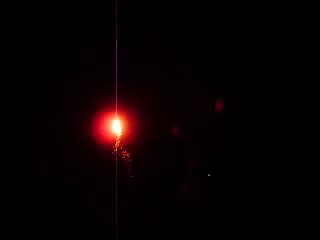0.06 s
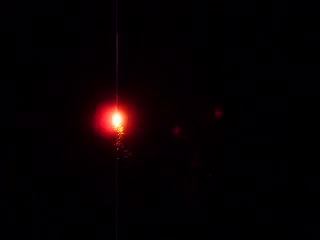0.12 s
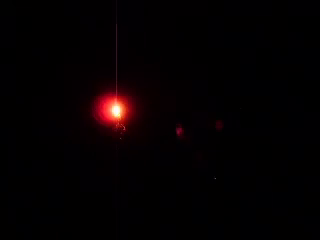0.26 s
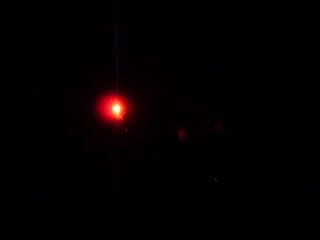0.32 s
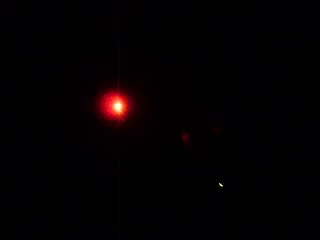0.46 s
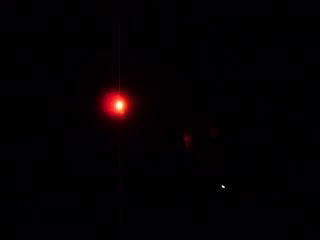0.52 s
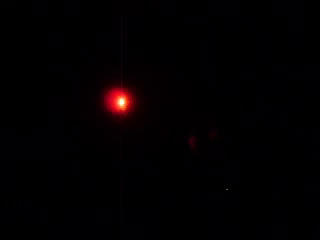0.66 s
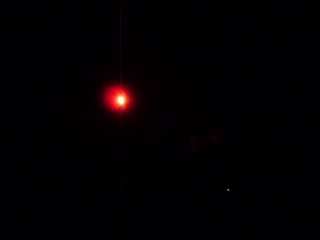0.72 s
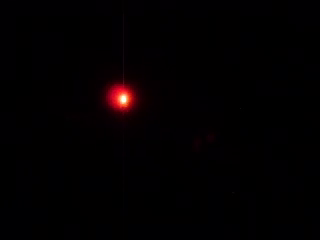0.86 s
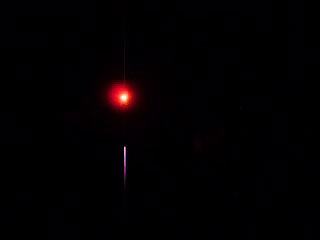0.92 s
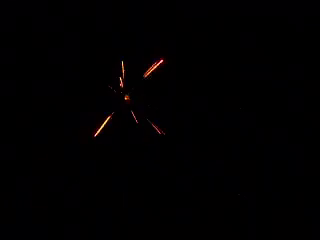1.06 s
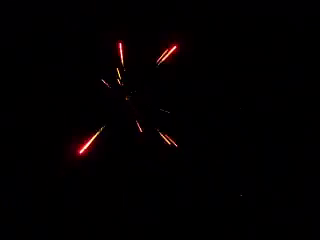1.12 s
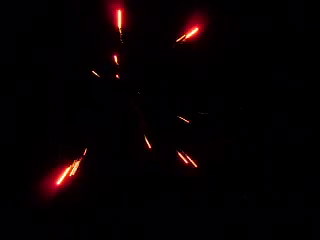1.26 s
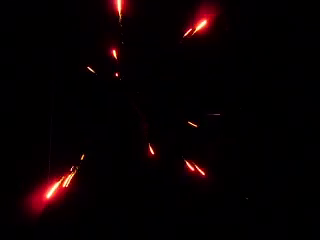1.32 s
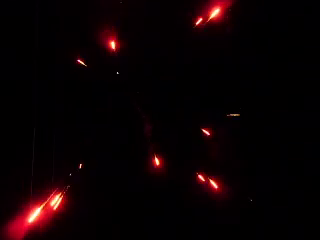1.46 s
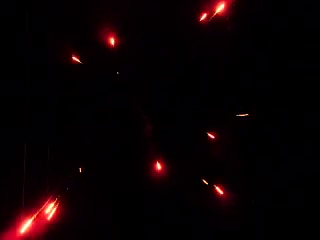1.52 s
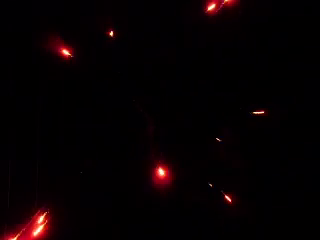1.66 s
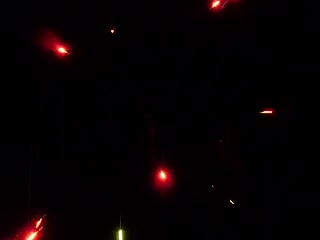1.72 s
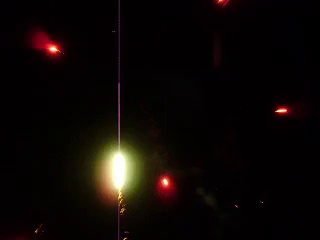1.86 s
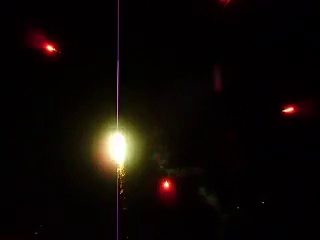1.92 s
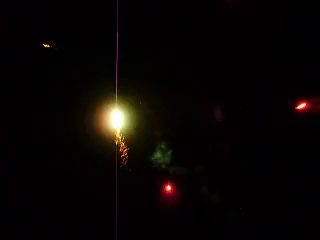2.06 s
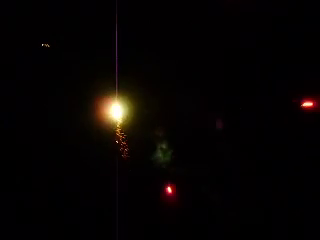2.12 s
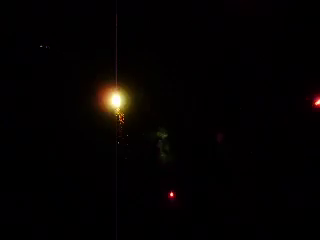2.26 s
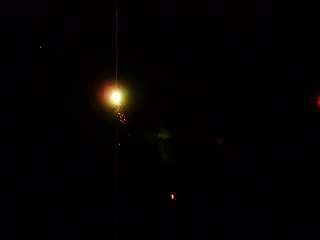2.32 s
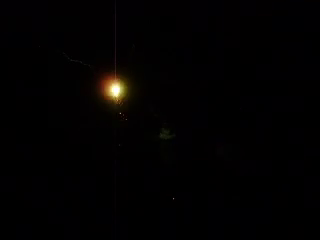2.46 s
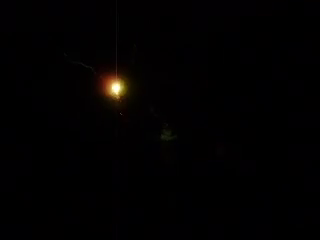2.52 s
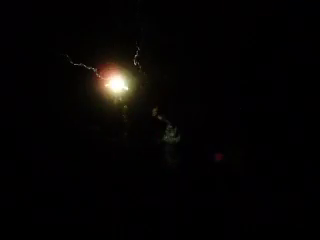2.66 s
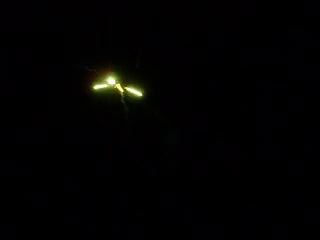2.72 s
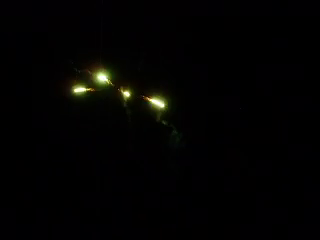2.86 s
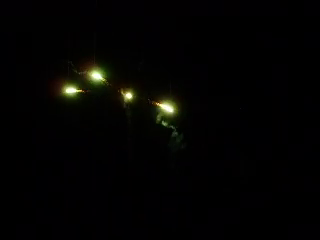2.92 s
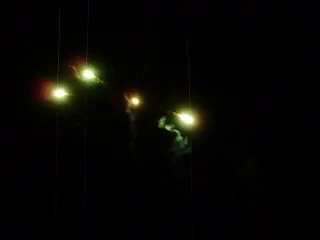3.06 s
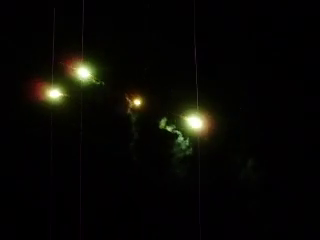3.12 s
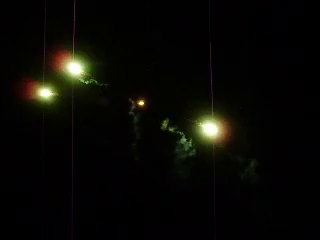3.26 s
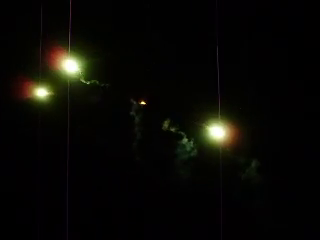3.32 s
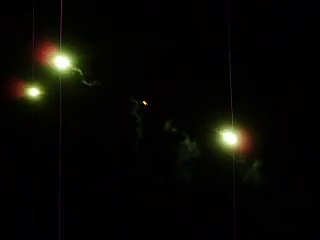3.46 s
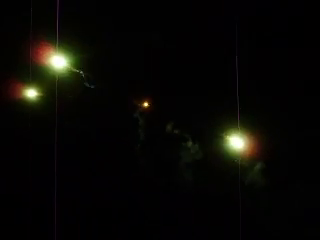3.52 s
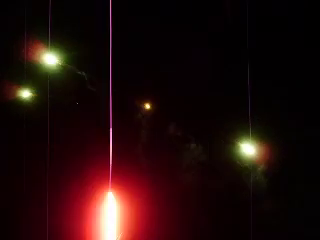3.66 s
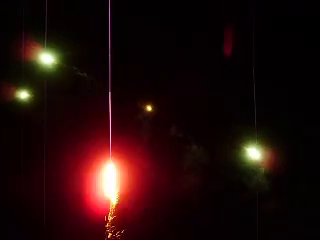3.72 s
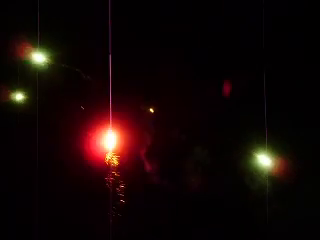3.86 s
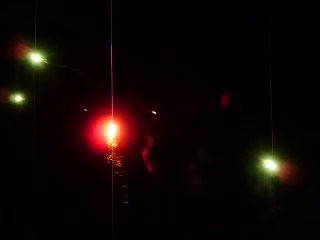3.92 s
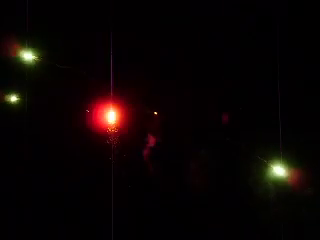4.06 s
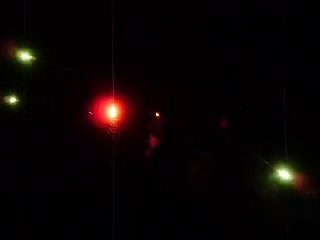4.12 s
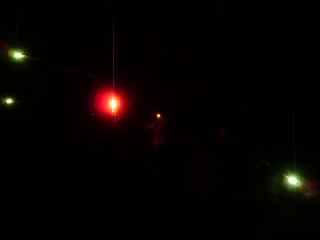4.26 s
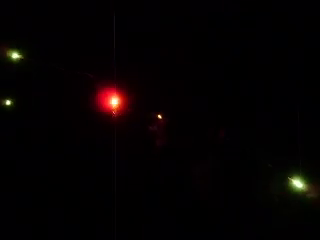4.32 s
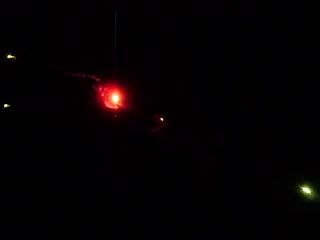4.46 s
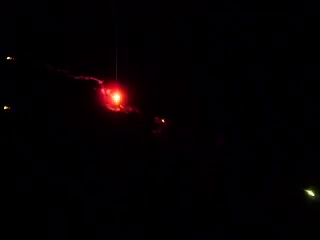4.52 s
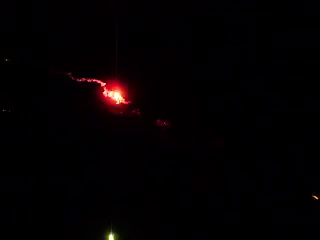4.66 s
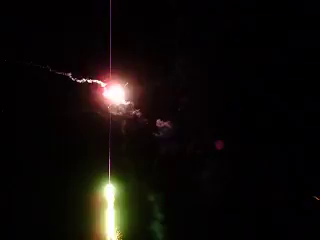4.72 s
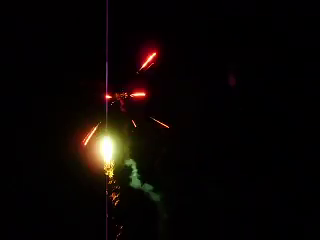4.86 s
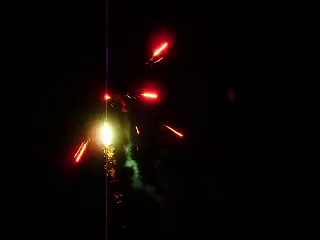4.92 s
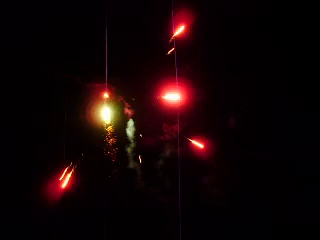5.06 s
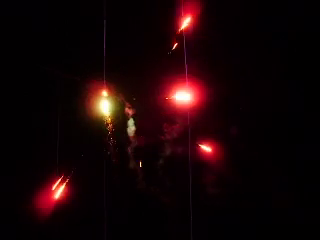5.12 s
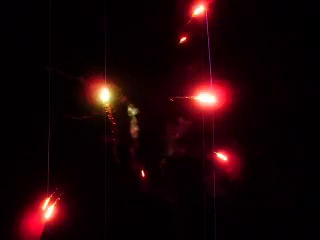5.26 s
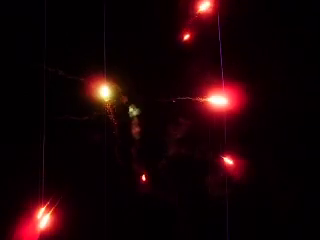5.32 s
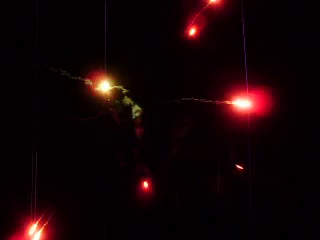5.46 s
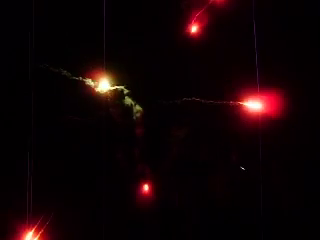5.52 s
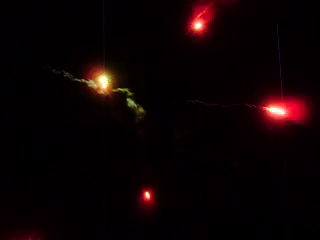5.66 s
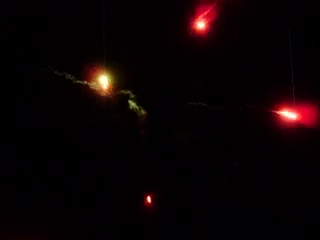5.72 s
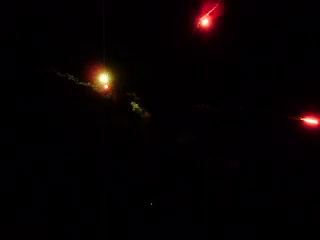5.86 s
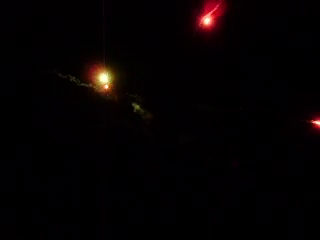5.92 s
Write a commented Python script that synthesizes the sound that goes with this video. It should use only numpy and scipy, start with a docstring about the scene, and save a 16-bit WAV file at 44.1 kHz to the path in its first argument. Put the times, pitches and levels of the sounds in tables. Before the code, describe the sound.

Night fireworks outdoors, heard through a small, muffled microphone that overloads on every shot. At first only the fading roll and hiss of an earlier burst, over low open-air rumble. A soft thump at 1.1 s, then a hard overhead bang at 1.2 s with fast wall reflections and, just under a tenth of a second later, a very short ragged chirp falling in pitch. Its far echoes return in waves of clumpy roar and hiss. A tube launch thuds at 1.7 s; distant slaps at about 2.15 s and a faint thump at 2.5 s. A brighter, higher-pitched bang follows at 2.9 s. Launch thuds land at 3.5 s and 4.6 s, each leaving a low rumble, with a dull thump at 4.4 s between. The last bang comes at 4.95 s; its echoes linger while low rumble swells around 5.3 s and a cluster of dull far slaps patters from 5.7 to 5.9 s.

```python
"""Echoes of earlier shots roll in by waves under the hiss of burning stars: a fireworks cake fires comets at night.
Each shot leaves its tube with a thud, then shells bang overhead: filtered pressure pulses plus single echoes and
fading noise from nearby walls. A ribbed surface answers each burst with a short falling chirp of two ragged sines.
Far echoes, hiss and rumble are clumpy filtered noise; dull thumps and far slaps dot the scene.
A small, dull microphone overloads on the shots."""
import sys
import numpy as np
from scipy import signal
from scipy.fft import rfft, irfft
from scipy.io import wavfile
from scipy.ndimage import uniform_filter1d

SR = 44100
rng = np.random.default_rng(int(sys.argv[2]) if len(sys.argv) > 2 else 0)


def master_out(mix):
    """Clip the mix to full scale and print it as 16-bit PCM to the path in sys.argv[1]."""
    frames = np.transpose(np.atleast_2d(mix))
    ceiling = np.clip(frames, -1, 1)
    pcm = np.round(ceiling * 32767).astype(np.int16)
    wavfile.write(sys.argv[1], SR, pcm)


N = 263718


def amp(db):
    """Decibels to gain."""
    return 10 ** (np.asarray(db) / 20)


def evened(x):
    """Scales to rms 1."""
    return x / np.sqrt(np.mean(x ** 2) + 1e-20)


def peaked(x):
    """Scales to peak 1."""
    return x / abs(x).max()


def add(mix, start_s, sound):
    """Mixes a sound in at a time; it may have begun before time zero."""
    at = round(start_s * SR)
    sound = sound[max(-at, 0):]
    part = mix[max(at, 0):][:len(sound)]
    part += sound[:len(part)]


def shifted(spectrum, factor):
    """The same spectrum, higher or lower in pitch."""
    return np.array(spectrum) * [factor, 1]


def colour(x, spectrum, size=8192):
    """Causal minimum-phase filter with a given spectrum."""
    hz, db = np.transpose(spectrum)
    f = abs(np.fft.fftfreq(size, 1 / SR))
    gain_db = np.interp(np.log(f + 1), np.log(hz + 1), db)
    log_gain = np.log(amp(gain_db))
    response = np.exp(np.conj(signal.hilbert(log_gain)))
    taps = np.fft.ifft(response).real[:size // 2]
    return signal.fftconvolve(x, taps)[:len(x)]


def drift(n, per_s):
    """Smooth random wander of rms 1."""
    f = np.fft.rfftfreq(n, 1 / SR)
    lowpass = np.exp(-(f / per_s) ** 2)
    return evened(irfft(rfft(rng.standard_normal(n)) * lowpass, n))


def clatter(n, spectrum, lumpy_db, lumps_per_s):
    """Countless overlapping echoes that arrive in clumps; rms 1."""
    clumps = amp(lumpy_db * drift(n, lumps_per_s))
    return evened(colour(rng.standard_normal(n) * clumps, spectrum))


def swell(age_s, rise_s, fade_s):
    """Gain that rises in a straight line and then dies away exponentially."""
    return np.clip(age_s / rise_s, 0, 1) * np.exp(-np.maximum(age_s - rise_s, 0) / fade_s)


def blast(length_s, size=2048):
    """Pressure jump followed by a longer suction; length_s is the zero crossing."""
    u = np.arange(size) / SR / length_s
    return (1 - u) * np.exp(-u)


def rough_wall(fade_s, size=1024):
    """A rough surface smears an echo over a few milliseconds and keeps its energy and colour."""
    smear = rfft(rng.standard_normal(size) * np.exp(-np.arange(size) / SR / fade_s))
    smooth_power = uniform_filter1d(abs(smear) ** 2, size=15)
    return irfft(smear / np.sqrt(smooth_power), size)


# Low rumble of the open air. Each row: time in s, level in dB.
AIR_RUMBLE = [(0, -47), (1, -47), (2.6, -44), (3.4, -46), (4.0, -33.5), (4.9, -33), (5.35, -23),
              (5.75, -30), (5.98, -30)]
# Rumble spectrum. Each row: frequency in Hz, relative density in dB per Hz.
RUMBLE_SPECTRUM = [(12, -23), (30, -5), (60, -5), (100, -2), (140, -1.5), (260, -23)]
RUMBLE_SWELL_S, RUMBLE_FADE_S, LAUNCH_RUMBLE_DB = .16, .2, -28


def rumble():
    """Every launch leaves a low rumble, which swells and dies away over that of the open air."""
    t = np.arange(N) / SR
    power = amp(np.interp(t, *np.transpose(AIR_RUMBLE))) ** 2
    for start_s, _, _ in LAUNCHES:
        launch_gain = amp(LAUNCH_RUMBLE_DB) * swell(t - start_s, RUMBLE_SWELL_S, RUMBLE_FADE_S)
        power = power + launch_gain ** 2
    return np.sqrt(power) * clatter(N, RUMBLE_SPECTRUM, lumpy_db=0.6, lumps_per_s=15)


# Far echoes of each burst. Each row: delay in s, swell time in s, fade time constant in s,
# roll in dB, hiss in dB.
ECHO_WAVES = [(.12, .15, .9, -15.7, -14.8), (.44, .05, .15, -19, -18.5), (.89, .06, 1.2, -13.2, -14.3),
              (1.41, .19, 3, -16, -19)]
# Rolling echoes, at pitch factor 1. Each row: frequency in Hz, relative density in dB per Hz.
ROLL_SPECTRUM = [(15, -29.5), (30, -11.5), (110, -11), (180, -15), (260, -7.3), (400, -0.5), (680, -0.5),
                 (850, -3.7), (1050, -9.7), (1400, -19), (2500, -41)]
# Hiss. Each row: frequency in Hz, relative density in dB per Hz.
HISS_SPECTRUM = [(600, -21.5), (1100, -7.7), (1500, -0.7), (2300, .6), (3000, -2.6), (3500, -8.5),
                 (4500, -12.5)]
AIR_ROLL_DB, STAR_HISS_DB = -42, -48  # steady background: open air, burning stars
AIR_DB_PER_S = 6.2  # air absorption of the hiss beyond that of the roll


def rush():
    """Each burst rolls back from far away in waves, at the pitch of its bang; the hiss fades first."""
    t = np.arange(N) / SR
    out = amp(AIR_ROLL_DB) * clatter(N, ROLL_SPECTRUM, lumpy_db=0.5, lumps_per_s=53)
    hiss_power = amp(STAR_HISS_DB) ** 2
    for start_s, _, _, pitch, _, echo_db, fall_db_per_s in BURSTS:
        age_s = np.maximum(t - start_s, 0)
        level = amp(echo_db - fall_db_per_s * age_s)
        absorbed = amp(-AIR_DB_PER_S * age_s)
        roll_power = 0
        for delay_s, rise_s, fade_s, roll_db, hiss_db in ECHO_WAVES:
            wave = level * swell(age_s - delay_s, rise_s, fade_s)
            roll_power = roll_power + (amp(roll_db) * wave) ** 2
            hiss_power = hiss_power + (amp(hiss_db) * absorbed * wave) ** 2
        roll = clatter(N, shifted(ROLL_SPECTRUM, pitch), lumpy_db=1.1, lumps_per_s=54)
        out += np.sqrt(roll_power) * roll
    return out + np.sqrt(hiss_power) * clatter(N, HISS_SPECTRUM, lumpy_db=1.57, lumps_per_s=65)


# Soft low thumps. Each row: start in s, peak in dB, pulse length in s, upper band edge in Hz.
THUMPS = [(1.103, -16, 0.00055, 800), (2.514, -22, 0.0021, 90), (4.396, -13, 0.0008, 400),
          (5.292, -13, 0.0023, 130)]


def thumps():
    """Faint, dull pops, blurred by the ground they cross: smeared, band-passed blasts."""
    out = np.zeros(N)
    for start_s, peak_db, length_s, top_hz in THUMPS:
        dull = signal.butter(3, [top_hz / 4, top_hz], "bandpass", fs=SR, output="sos")
        blurred = signal.fftconvolve(blast(length_s), rough_wall(fade_s=.004))
        add(out, start_s, amp(peak_db) * peaked(signal.sosfilt(dull, blurred)))
    return out


# Dull slaps from far away. Each row: start in s, level before the fade in dB.
FAR_SLAPS = [(2.140, -17), (2.174, -15.5), (2.812, -20), (3.812, -23.5), (5.254, -11.5), (5.660, -19),
             (5.711, -17), (5.762, -12), (5.809, -14.5), (5.892, -15)]


def far_slaps():
    """Distant echoes have lost their crack and fade within a few cycles."""
    out, t = np.zeros(N), np.arange(4096) / SR
    for start_s, level_db in FAR_SLAPS:
        noise = evened(colour(rng.standard_normal(len(t)), ROLL_SPECTRUM))
        add(out, start_s, amp(level_db) * np.exp(-t / 0.0084) * noise)
    return out


# Blast wave itself. Each row: frequency in Hz, relative density in dB per Hz.
THUD_SPECTRUM = [(20, -21), (50, -13), (100, -9), (180, -1), (350, 1.5), (600, -1.5), (1000, 1.5),
                 (1400, -15), (2200, -29)]
# Crack. Each row: frequency in Hz, relative density in dB per Hz.
CRACK_SPECTRUM = [(500, -31.5), (1100, -14.5), (1600, -8.5), (2100, 2.5), (2700, 3), (3400, 2.5),
                  (4500, -5.5)]


def shot(paths, scatter, body_spectrum, length_s, direct_db, lumpy_db):
    """Body and crack of one explosion: the direct blast, single echoes, then fading clatter."""
    n = 2 * SR
    t = np.arange(n) / SR
    parts = []
    bands = [(THUD_SPECTRUM, body_spectrum), (CRACK_SPECTRUM, CRACK_SPECTRUM)]
    for k, (clean, scattered) in enumerate(bands):
        pulse = peaked(colour(blast(length_s), clean))
        out, power = np.zeros(n), np.zeros(n)
        add(out, 0, amp(direct_db[k]) * pulse)
        for delay_s, *db in paths:
            echo = signal.fftconvolve(pulse, rough_wall(fade_s=0.002))
            add(out, delay_s, amp(db[k]) * echo)
        for delay_s, fade_s, *db in scatter:
            add(power, delay_s, amp(db[k]) ** 2 * np.exp(-2 * t / fade_s))
        parts.append(out + np.sqrt(power) * clatter(n, scattered, lumpy_db[k], lumps_per_s=180))
    return parts


def rib_chirp(start_hz, end_hz, length_s, octave_db, rough):
    """Echoes from a row of ribs arrive ever further apart: a ragged falling tone with its octave."""
    n = round(length_s * SR)
    phase = 2 * np.pi * np.cumsum(np.geomspace(start_hz, end_hz, n)) / SR
    uneven = 1 + rough * drift(n, per_s=450)
    tone = np.sin(phase) + amp(octave_db) * np.sin(2 * phase)
    return signal.windows.tukey(n, .3) * uneven * tone


# Shells bursting overhead. Each row: start in s, strength in dB, extra crack in dB, pitch factor of the bang,
# chirp in dB, rolling echo in dB, fall of that echo in dB per s.
BURSTS = [(-1.25, 0, 0, .91, -9, 3.2, 8), (1.2217, .3, -0.5, 0.95, -12, .2, 5.1),
          (2.8739, -1.9, 3, 1.132, -9, -.6, 7.4), (4.9550, -2.5, -.5, 0.99, -10.5, -.9, 2.7)]
# Single reflections of a burst. Each row: delay in s, thud in dB, crack in dB.
BURST_PATHS = [(.0115, 16.5, 12.5), (.018, 10, -1.5), (.045, -4, 3), (.105, -11, -3.5), (.116, -5, 3.5),
               (.165, -6.5, -9), (.298, -9, -8)]
# Scatterers reached from overhead. Each row: delay in s, fade time constant in s, body in dB, crack in dB.
BURST_SCATTER = [(0, 0.0042, 12.5, 1), (0.014, 0.0095, 9.5, -5), (0.021, 0.105, -1.8, -11.5),
                 (0.086, 0.055, -7, -11), (0.163, .007, -9.5, -13)]
# Scattered body at pitch factor 1. Each row: frequency in Hz, relative density in dB per Hz.
BURST_BODY_SPECTRUM = [(20, -23.5), (60, -12), (130, -11.5), (250, -5.5), (400, -1), (700, 2), (1000, 0),
                       (1300, -11.5), (2200, -28.5)]
CHIRP_DELAY_S = .077


def bursts():
    """Shells bang overhead, each in its own place; a ribbed surface answers each one."""
    out = np.zeros(N)
    for start_s, strength_db, bright_db, pitch, chirp_db, *_ in BURSTS:
        body, crack = shot(BURST_PATHS, BURST_SCATTER, shifted(BURST_BODY_SPECTRUM, pitch),
                           length_s=.0007 / pitch, direct_db=(14, 6.5), lumpy_db=(1.8, 1.8))
        add(out, start_s, amp(strength_db) * (body + amp(bright_db) * crack))
        chirp = rib_chirp(start_hz=2020, end_hz=1570, length_s=.028, octave_db=-6.5, rough=.42)
        add(out, start_s + CHIRP_DELAY_S, amp(chirp_db) * chirp)
    return out


# Shots leaving the tubes. Each row: start in s, strength in dB, extra crack in dB.
LAUNCHES = [(-.2, -2, -1), (1.6811, -2.3, 2.8), (3.5479, 0, 1.5), (4.6290, -.3, 2.3)]
# Single reflections of a launch. Each row: delay in s, thud in dB, crack in dB.
LAUNCH_PATHS = [(.005, 6, -16), (.013, 6, -4.5), (.0195, 7, 7), (.032, -12, 11.5), (.040, 0.5, -3),
                (.047, 2.5, 8), (.072, -19, 3.5), (.087, -23, 2), (.094, 1.5, -12.5), (.131, -2, -12),
                (.224, -13, -5), (.293, -27, -4)]
# Scatterers around the cake. Each row: delay in s, fade time constant in s, body in dB, crack in dB.
LAUNCH_SCATTER = [(.001, .019, 7.5, 2.5), (0.048, 0.058, -23, -15.5), (0.099, 0.07, -14, -11),
                  (0.162, .035, -19, -12), (.26, 0.36, -32.5, -31)]
# Scattered body. Each row: frequency in Hz, relative density in dB per Hz.
LAUNCH_BODY_SPECTRUM = [(20, -24), (50, -12.5), (100, -10), (150, -1), (220, -1), (300, -3), (400, -1),
                        (500, -5), (900, -8.5), (1400, -9), (2200, -32)]


def launches():
    """Lift charges thud out of the tubes; all leave from one spot, so all have the same echoes."""
    out = np.zeros(N)
    body, crack = shot(LAUNCH_PATHS, LAUNCH_SCATTER, LAUNCH_BODY_SPECTRUM,
                       length_s=0.0019, direct_db=(13, 7), lumpy_db=(1.5, 2.1))
    for start_s, strength_db, bright_db in LAUNCHES:
        add(out, start_s, amp(strength_db) * (body + amp(bright_db) * crack))
    return out


def scene():
    """Everything as it reaches the microphone."""
    return (launches() + bursts() + far_slaps() + rush() + rumble() + thumps())[None]


# Microphone and its steep input filter. Each row: frequency in Hz, gain in dB.
MICROPHONE = [(10, -3.5), (30, -3.5), (3300, -0.5), (3750, -5.5), (4050, -15.5), (4400, -21.5),
              (4800, -57.5), (5600, -100)]
# Treble droop after the overload. Each row: frequency in Hz, gain in dB.
DROOP = [(4000, 0), (4800, -7), (8000, -3.5), (12000, -9), (16000, -7.5)]
EDGE_HZ = 16000


def record(dry):
    """The microphone cuts the treble; its overload flattens peaks and adds nearly all the top end."""
    ceiling = .71
    dull = colour(dry[0], MICROPHONE)
    clipped = colour(np.clip(dull, -ceiling, ceiling), DROOP)
    lowpass = signal.firwin(511, EDGE_HZ, window=("kaiser", 9), fs=SR)
    return signal.oaconvolve(clipped, lowpass, "same")[None]


dry = scene()
out = record(dry)
master_out(out)
```